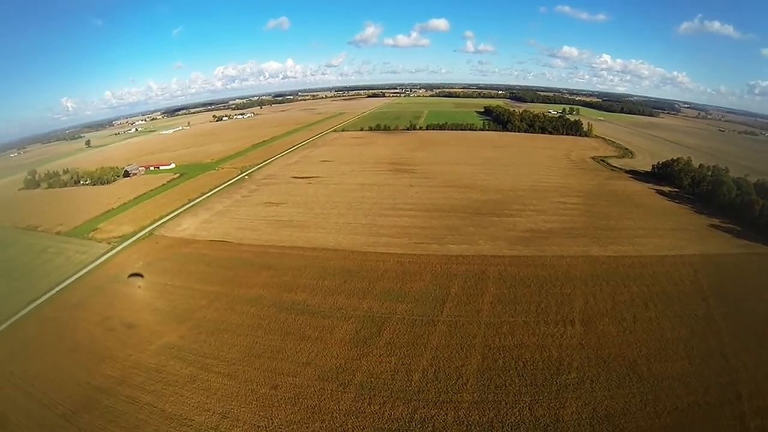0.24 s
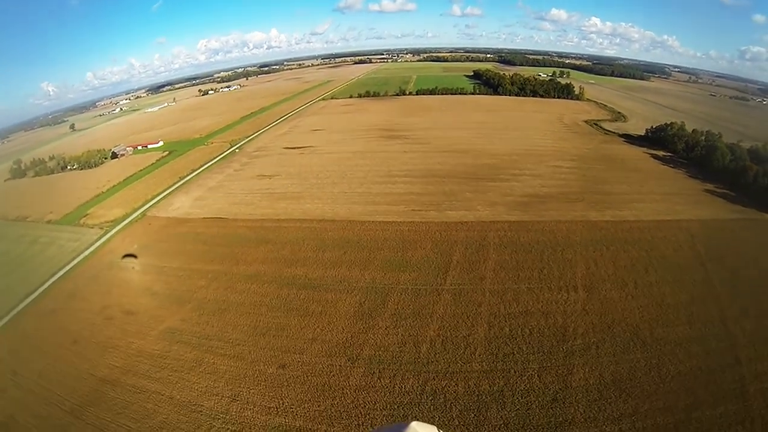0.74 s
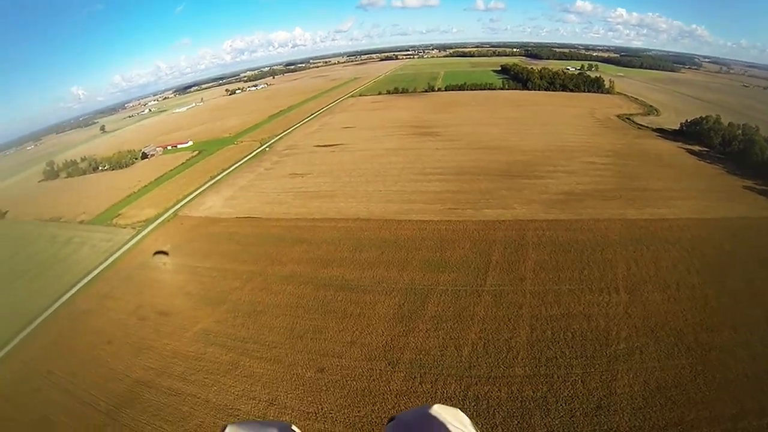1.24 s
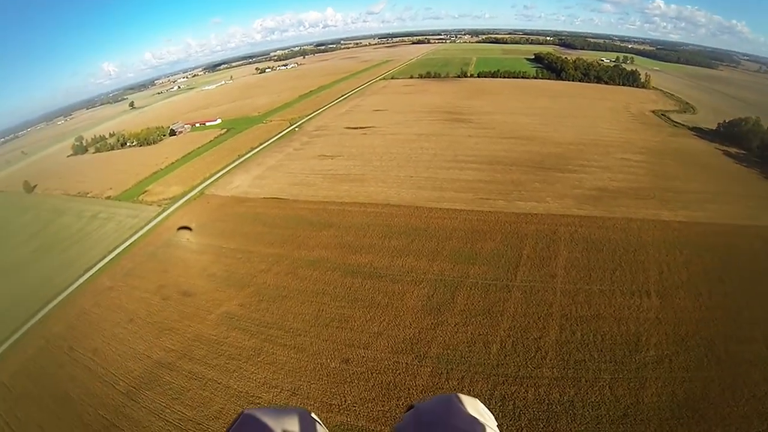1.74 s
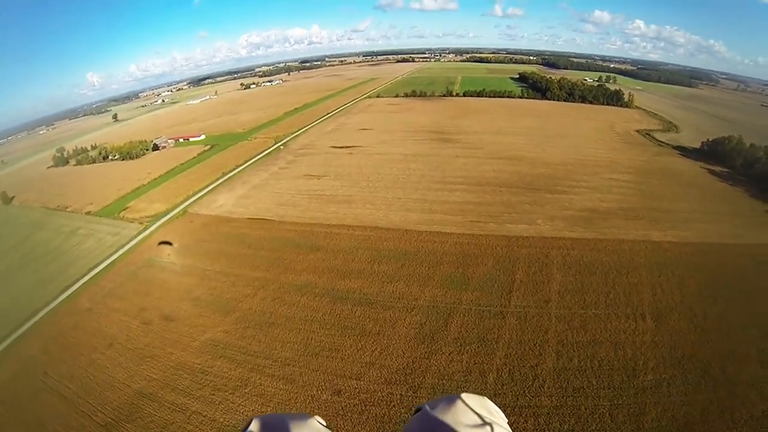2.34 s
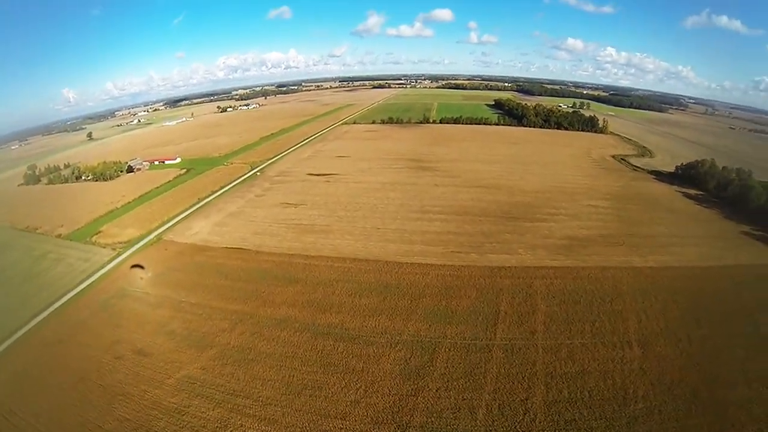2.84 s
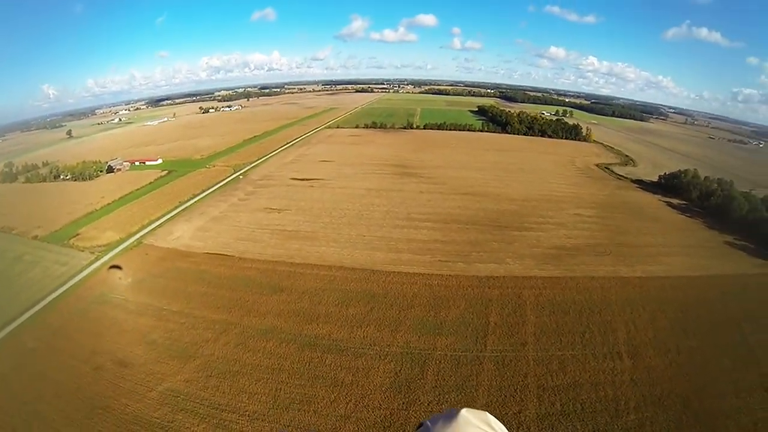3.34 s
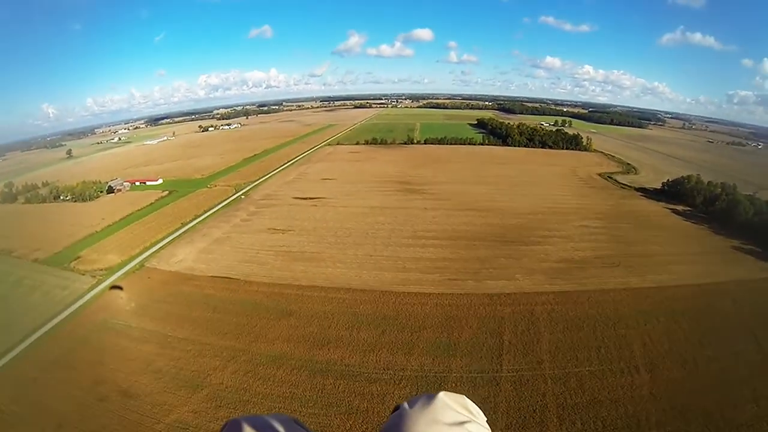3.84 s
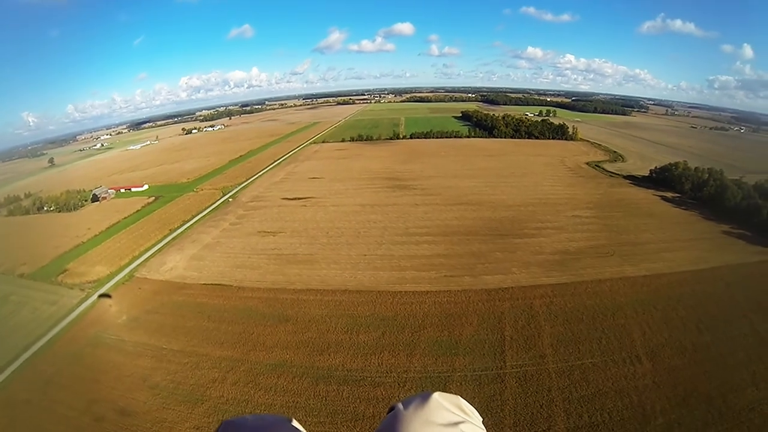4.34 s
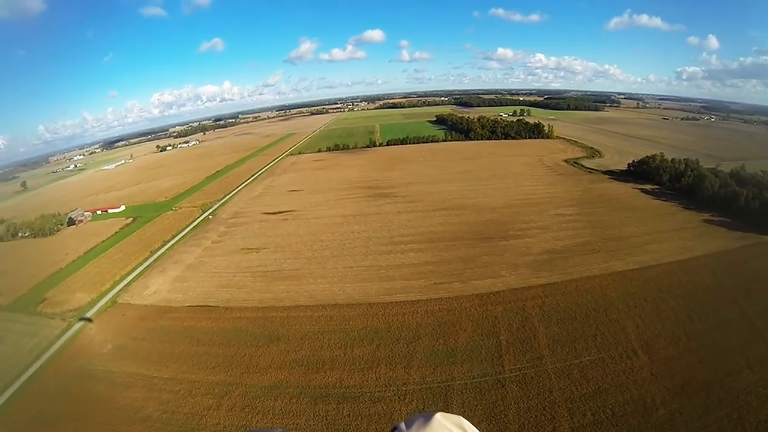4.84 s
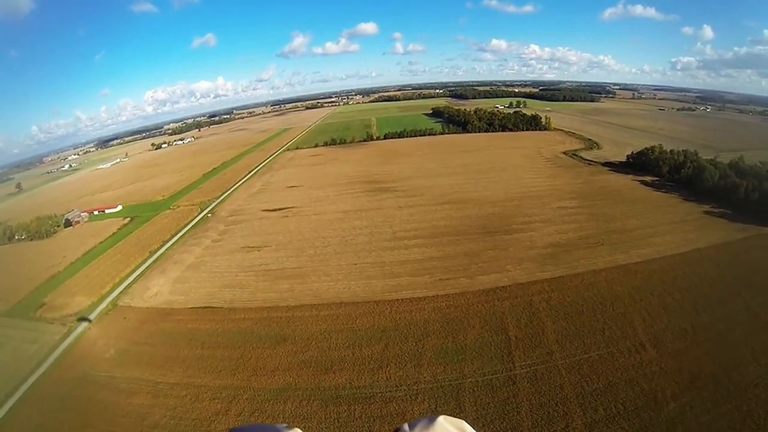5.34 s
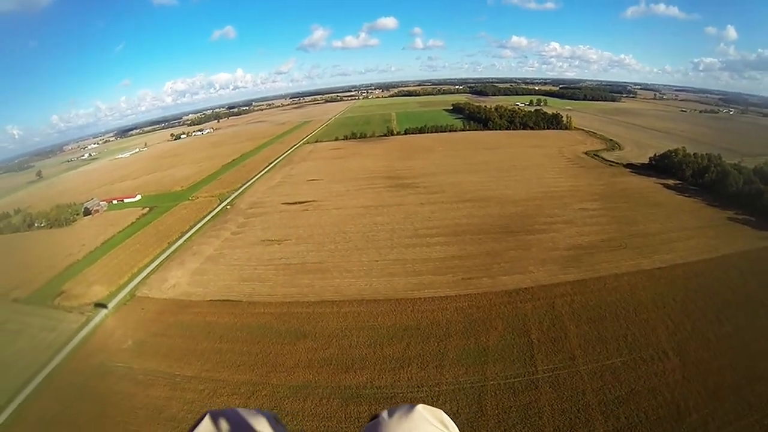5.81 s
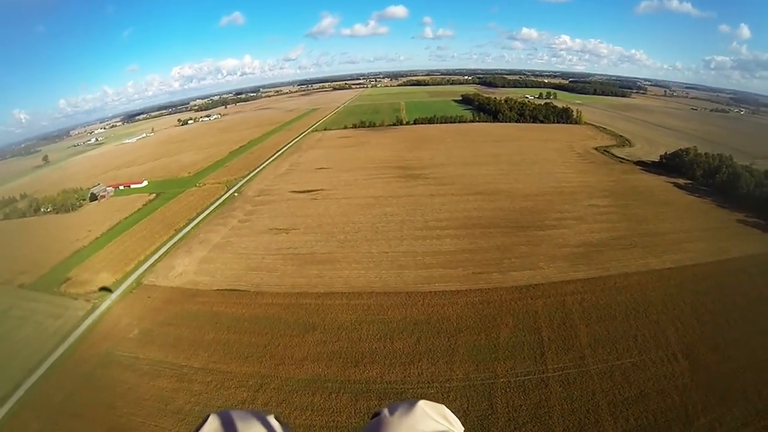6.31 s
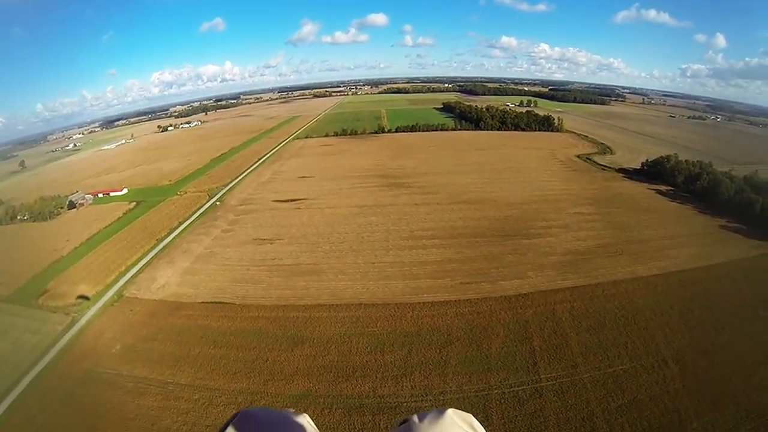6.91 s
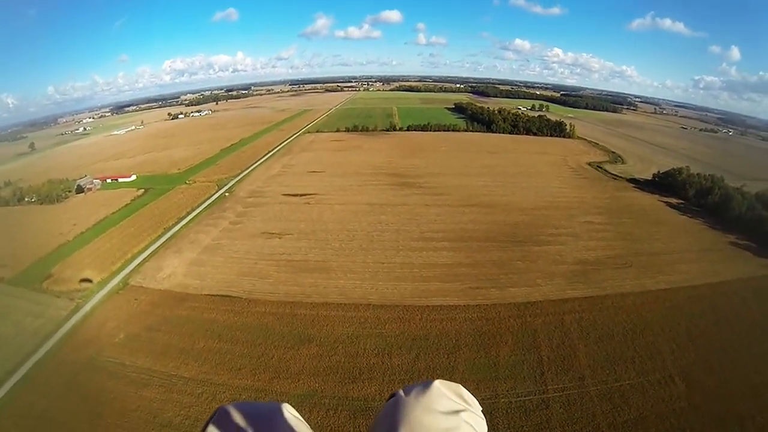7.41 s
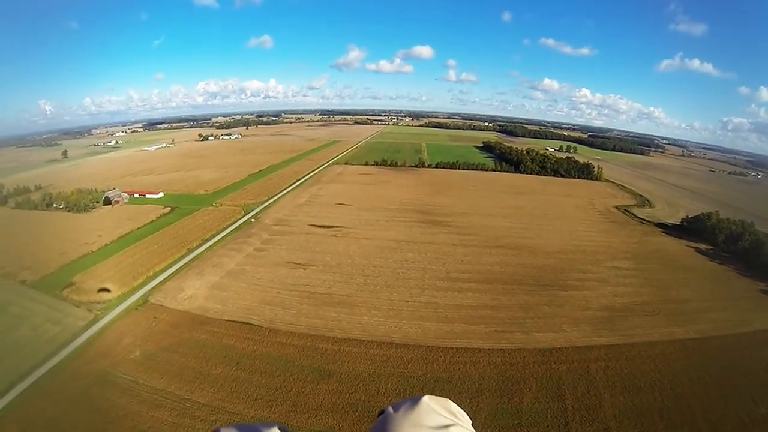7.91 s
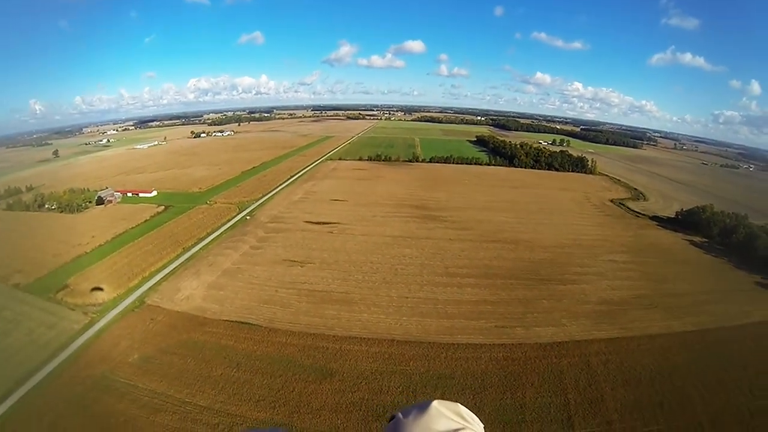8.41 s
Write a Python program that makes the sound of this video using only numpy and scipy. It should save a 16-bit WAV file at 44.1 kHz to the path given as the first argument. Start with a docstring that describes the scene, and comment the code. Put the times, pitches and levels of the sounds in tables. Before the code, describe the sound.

Continuous close paramotor cruise: deep throbbing hum, raspy fluttering engine buzz, propeller wash roar and soft low wind buffets, heard through a closed camera case.

```python
"""Two low hums beat against each other, under a chopped buzz and roar: a paramotor cruising in open air.
It is heard by a small camera in a closed case worn by the pilot; the case rings above 1 kHz.
A one-cylinder two-stroke (harmonic series) turns a two-blade propeller (phase-locked series) by a reduction drive.
The blades amplitude-modulate the engine buzz and the filtered noise of their own wash.
Wind buffets the case as low filtered noise, and a difference tone wavers beneath."""
import sys
import numpy as np
from scipy import signal
from scipy.fft import rfft, irfft
from scipy.io import wavfile
from scipy.ndimage import uniform_filter1d

SR = 44100
rng = np.random.default_rng(int(sys.argv[2]) if len(sys.argv) > 2 else 0)


def store_pcm(level_fs):
    """Save levels as 16-bit WAV."""
    pcm = np.round(np.clip(level_fs, -1, 1) * 32767).astype(np.int16)
    wavfile.write(sys.argv[1], SR, np.atleast_2d(pcm).T)


N = 381895


def undb(db):
    """Level law: amplitude ratio is ten to the power of dB / 20."""
    return 10 ** (np.asarray(db) / 20)


def walk(rate):
    """Random modulation: levels held for 1 / rate seconds, smoothed by two moving averages; spread near 1."""
    hold = int(SR / rate)
    steps = np.repeat(rng.standard_normal(N // hold + 1), hold)
    return 1.22 * uniform_filter1d(uniform_filter1d(steps, hold), hold)[:N]


def curves(table):
    """Piecewise-linear envelopes: every column after the time is joined by straight lines."""
    seconds, *columns = np.transpose(table)
    return [np.interp(np.arange(N) / SR, seconds, column) for column in columns]


def minimum_phase_filter(x, table):
    """Spectral shaping: a causal filter, folded from the cepstrum, gives unit white noise the table's density."""
    table_hz, table_db = np.transpose(table)
    grid_hz = np.fft.rfftfreq(8192, 1 / SR)
    density_db = np.interp(np.log(grid_hz + 1), np.log(table_hz), table_db, left=-150, right=-150)
    cepstrum = irfft(np.log(undb(density_db) * np.sqrt(SR / 2)))
    # fold the negative times onto the positive ones
    half = len(cepstrum) // 2
    cepstrum[1:half] *= 2
    cepstrum[half + 1:] = 0
    impulse_response = irfft(np.exp(rfft(cepstrum)))
    return signal.fftconvolve(x, impulse_response)[:N]


def patchy_noise(flicker_db, flicker_rate, centres_hz, grain_db, grain_rate, gate):
    """Band-wise modulation: each band of white noise flickers, grains and passes a gate set by its centre."""
    spectrum = rfft(rng.standard_normal(N))
    log_hz = np.log(np.fft.rfftfreq(N, 1 / SR) + 1)
    noise = 0
    for centre, row in zip(centres_hz, np.eye(len(centres_hz))):
        share = np.interp(log_hz, np.log(centres_hz), row)  # the overlapping shares add up to 1
        band = irfft(spectrum * share, N)
        level_db = flicker_db * walk(flicker_rate) + grain_db * walk(grain_rate)
        noise = noise + undb(level_db) * gate(centre) * band
    # random level in dB raises the mean power
    return noise / undb(np.log(10) / 20 * (flicker_db ** 2 + grain_db ** 2))


def chop(shaft, once_db, pass_db, twice_db, lag_rad):
    """Amplitude modulation: gain swings once a turn, once a blade pass and twice a pass; mean power 1."""
    twice_lead_rad = 2.8
    angle = shaft - lag_rad
    swing_db = once_db * np.cos(angle) + pass_db * np.cos(2 * angle)
    swing_db = swing_db + twice_db * np.cos(4 * angle + twice_lead_rad)
    gain = undb(swing_db)
    return gain / np.sqrt(np.mean(gain ** 2))


# gusts (positive) and lulls (negative) of the wind: (time [s], peak level change [dB], time to fall to 1/e [s])
GUSTS_AND_LULLS = [(1.0, -6, .15), (2.0, 3.9, .2), (2.82, 6.5, 0.23), (3.63, 3, 0.14), (5.4, -3.8, 0.33),
                   (6.04, -1, .15), (7.17, -2.8, .2)]


def gusts():
    """Transient envelopes: each gust or lull is a bell curve in dB, over a restless breeze."""
    t = np.arange(N) / SR
    swells_db = sum(db * np.exp(-((t - s) / fall) ** 2) for s, db, fall in GUSTS_AND_LULLS)
    return swells_db + 1.3 * walk(4.5)


# buffeting on the case, before the gusts: (frequency [Hz], spectral density [dB per Hz])
BUFFETING_SPECTRUM = [(15, -71), (30, -55.5), (48, -50), (60, -40), (68, -49.5), (88, -54), (115, -55.5),
                      (170, -53), (215, -63.5), (420, -62), (570, -66.5), (800, -69.5), (1100, -85)]


def wind(shaft, gust_db):
    """Turbulent pressure noise: gusts act most in the deep bass; pulsing wash fills the low middle."""
    def gate(hz):
        gust = undb(gust_db * min(70 / hz, 1.))
        return gust * chop(shaft, 0.26, 1.1 * min(hz / 300, 1.), 0.34, 1.27)

    low = patchy_noise(1.34, 7.6, [30, 60, 120, 250, 600], .3, 100, gate)
    return minimum_phase_filter(low, BUFFETING_SPECTRUM)


def undertone(crank, shaft, level_db=-37):
    """Difference tone: firing rate minus shaft rate, where the two shakes mix in the frame; it wavers."""
    level = undb(level_db + 2.7 * walk(4.3))
    return np.sqrt(2) * level * np.cos(crank - shaft + 1.2 * walk(5.4))


# wash roar as the case rings with it, before its slow swells: (frequency [Hz], spectral density [dB per Hz])
ROAR_SPECTRUM = [(700, -79), (1000, -63), (1170, -47.5), (1330, -48), (1560, -49), (1720, -59.5),
                 (1900, -58), (2050, -53.5), (2330, -61), (2780, -68), (2990, -60), (3250, -68.5),
                 (3600, -76.5), (5000, -92.5)]
# hiss off the blade tips: (frequency [Hz], spectral density [dB per Hz])
HISS_SPECTRUM = [(2500, -92), (3800, -78.5), (4450, -84), (4970, -82.5), (5300, -88), (5660, -85.5),
                 (6150, -91), (6600, -87.5), (7300, -87.2), (8200, -95), (9500, -96.5), (10200, -93),
                 (13900, -104), (15200, -117)]


def wash(crank, shaft, wash_db):
    """Modulated turbulence noise: it throbs with each blade pass and a little with each firing; treble leads."""
    roar_lag_rad, puff_lead_rad = .85, 1.6  # of the shaft, of the crank

    def roar_gate(hz):
        return chop(shaft, .1, 2.5, 1.6, roar_lag_rad)

    def hiss_gate(hz):
        return chop(shaft, .1, 2.2, 1.5, .15 + 1600 / hz)  # the lag shrinks as pitch rises

    firing_gain = undb(0.93 * np.cos(crank + puff_lead_rad))
    roar = patchy_noise(0.43, 25, [1080, 1410, 2070, 3170], 2.04, 350, roar_gate)
    hiss = patchy_noise(0.69, 25, [4100, 5640, 7500, 10500, 13500], 0.74, 200, hiss_gate)
    roar = minimum_phase_filter(roar * firing_gain * undb(wash_db), ROAR_SPECTRUM)
    return roar + minimum_phase_filter(hiss * firing_gain, HISS_SPECTRUM)


# engine harmonics, before trims and swells: (multiple of the firing rate, level [dB rms])
ENGINE_HARMONICS = [(1, -16.6), (4, -61.2), (5, -53.8), (6, -44.8), (7, -47.1), (10, -51.2), (11, -43.6),
                    (12, -24.7), (13, -36.7), (14, -38.1), (16, -42.4), (18, -45.9), (23, -51.0),
                    (24, -54.4), (27, -59.3), (29, -51.1), (30, -53.5), (31, -52.1), (32, -54.3),
                    (34, -55.7), (35, -56.3), (36, -59.8), (48, -70.9), (50, -71.1), (51, -70.2),
                    (55, -78.2), (56, -77.4), (57, -75.8)]


def engine(crank, shaft, hum_db, buzz_db, waver_db=0.86, slip_rad=0.64):
    """Harmonic series: a clean hum at the firing rate; its overtones waver and are chopped by the blades."""
    buzz_lag_rad = -1.4
    (_, first_db), *overtones = ENGINE_HARMONICS
    hum = undb(first_db + 0.16 + hum_db + 0.43 * walk(10)) * np.cos(crank)
    buzz = 0
    for k, db in overtones:
        phase = k * crank + slip_rad * walk(9) + k * k  # k * k scatters the starting phases
        buzz = buzz + undb(db + waver_db * walk(14)) * np.cos(phase)
    chopped = undb(buzz_db + 0.3) * buzz * chop(shaft, 0.8, 2.46, 0.28, buzz_lag_rad)
    return np.sqrt(2) * (hum + chopped)


# blade harmonics, before swells: (multiple of the propeller shaft rate, level [dB rms],
# level gained per unit of overtone shift [dB])
BLADE_HARMONICS = [(1, -38.3, 0.0), (2, -20.6, 0.0), (4, -31.5, 0.1), (6, -40.1, 2.9), (8, -39.2, 2.1),
                   (10, -42.6, -1.3), (12, -41.1, -2.0), (14, -45.0, 3.1), (16, -43.7, 4.3),
                   (18, -45.7, 2.0), (20, -49.8, 0.5), (22, -46.1, 0.2), (24, -46.1, 4.2),
                   (26, -46.9, -1.4), (28, -39.2, -0.8), (30, -31.6, 1.1), (32, -34.4, -1.4),
                   (34, -35.1, 2.2), (36, -38.6, -1.8), (38, -38.1, -0.9), (40, -34.2, 1.2),
                   (42, -36.6, 1.6), (44, -45.6, 0.3), (46, -50.1, 0.1), (48, -50.9, 0.1),
                   (50, -46.9, -0.0), (52, -45.0, 1.1), (54, -51.1, -0.9)]


def propeller(shaft, hum_db, shift, waver_db=1.03, drift_db=1.35, slip_rad=0.019):
    """Phase-locked harmonics: each blade pass is a slap, its high harmonics less steady."""
    slap_spread_rad = .04
    slaps = 0
    for k, db, shift_db in BLADE_HARMONICS:
        loose = min(k / 14, 1.)  # turbulence unsettles the short wavelengths most
        if k == 2:  # the blade-pass hum itself
            swell_db = hum_db
        else:  # the balance wanders: some overtones rise while others sink
            swell_db = shift_db * shift + loose * (drift_db * walk(1.59) + waver_db * walk(11))
        phase = k * shaft - slap_spread_rad * k * k + slip_rad * k * loose * walk(7)
        slaps = slaps + undb(db + swell_db) * np.cos(phase)
    return np.sqrt(2) * slaps


# engine speed, sagging slowly at a held throttle: (time [s], firing rate [Hz])
FIRING_RATE = [(0, 99.45), (.5, 99.28), (.85, 98.9), (1.2, 98.91), (1.5, 99.13), (1.8, 98.92), (2.4, 98.85),
               (2.85, 98.32), (3.5, 98.19), (3.9, 97.93), (4.5, 97.92), (5.4, 97.59), (6.05, 97.16),
               (6.65, 97.05), (7.05, 97.17), (7.45, 97.13), (7.65, 97.4), (8.3, 97.38), (8.66, 97.27)]
# the two hums swell in turn about every two seconds:
# (time [s], engine hum level change [dB], blade hum level change [dB])
HUM_SWELLS = [(0, 1, 0.5), (.4, -2, 1), (.8, -.5, -.4), (1.4, -1.7, 0), (2.0, 1.4, -3.5), (2.42, -0.9, 2.3),
              (3.05, -0.5, 0.5), (3.25, -1, 0), (3.42, 1, -3.7), (3.65, 2.5, -2), (4.3, 1, 1.5),
              (4.8, -1.1, 0.2), (5.24, -1.7, -.5), (5.9, 2, 1.5), (6.2, .9, 2), (6.45, -1, 2),
              (6.7, 1.3, 2.2), (7.05, .2, -1.5), (7.65, .4, -1.7), (7.9, .9, -0.5), (8.5, -1.2, 1.2)]
# balance of the blade overtones: (time [s], overtone shift [units])
OVERTONE_SHIFT = [(0, -3), (.4, -2.5), (1.2, -.9), (2.0, 1.5), (3.0, .3), (4.0, 0.75), (4.5, 0.07),
                  (4.85, -0.8), (5.45, -1.2), (5.9, 1), (6.6, -0.3), (7.9, 1), (8.5, -1.9)]
# slow swells of the rough sounds: (time [s], engine buzz level change [dB], wash roar level change [dB])
BUZZ_AND_ROAR_SWELLS = [(0, -1.5, 0.7), (1.0, -2, 0.2), (2.1, 1, 0.7), (2.8, 2.5, 1.1), (3.4, 1.8, -0.4),
                        (3.7, -0.5, -0.1), (5.0, 0.4, -.2), (5.8, 1, -0.5), (7.2, -1.3, -0.9),
                        (8.0, 0.8, 0.6), (8.66, -1.3, -1)]


def scene():
    """Superposition: sources geared to one crank add linearly, with the wind around them."""
    reduction = 2.585  # firings per propeller turn
    (firing_hz,) = curves(FIRING_RATE)
    engine_hum_db, blade_hum_db = curves(HUM_SWELLS)
    (shift,) = curves(OVERTONE_SHIFT)
    buzz_db, wash_db = curves(BUZZ_AND_ROAR_SWELLS)

    turns = np.cumsum(firing_hz) / SR
    crank = 2 * np.pi * (turns - .25)
    # the slap arrives a little earlier or later as its overtones shift
    slap_offset_turns = .035 - .025 * uniform_filter1d(shift, SR // 2)
    shaft = 2 * np.pi * (turns / reduction + slap_offset_turns)

    sound = wind(shaft, gusts()) + undertone(crank, shaft) + wash(crank, shaft, wash_db)
    sound = sound + engine(crank, shaft, engine_hum_db, buzz_db + 0.3 * walk(5))  # the buzz flickers
    sound = sound + propeller(shaft, blade_hum_db, shift)
    return sound[None]


def record(dry, drive=0.51):
    """Soft saturation: the capsule rounds loud peaks, mixing the two hums; the camera cuts the top steeply."""
    rounded = np.tanh(drive * dry) / drive
    # opens and closes without a click
    samples = np.arange(N)
    fade = np.minimum(np.minimum(samples, samples[::-1]) / 100, 1)
    low_pass = signal.ellip(12, .2, 80, 15150, fs=SR, output="sos")  # ripple and stop band [dB], edge [Hz]
    return signal.sosfilt(low_pass, rounded * fade)


dry = scene()
out = record(dry)
store_pcm(out)
```